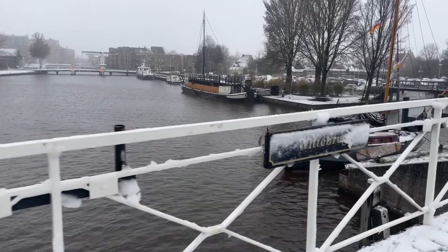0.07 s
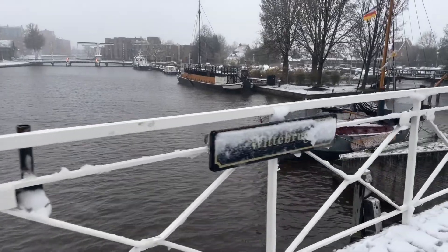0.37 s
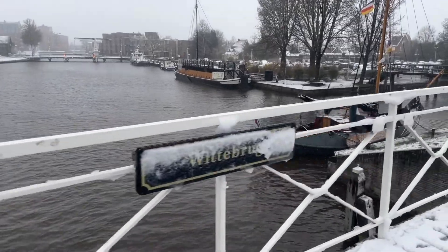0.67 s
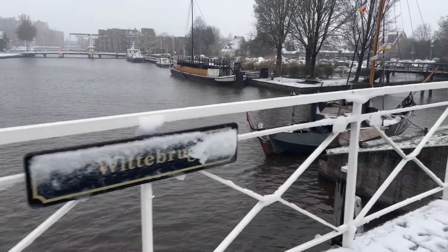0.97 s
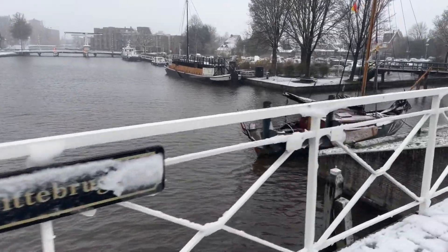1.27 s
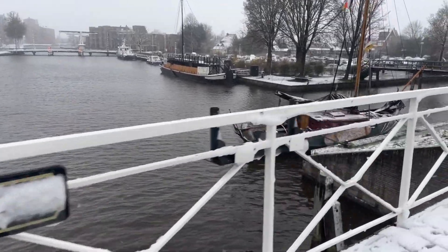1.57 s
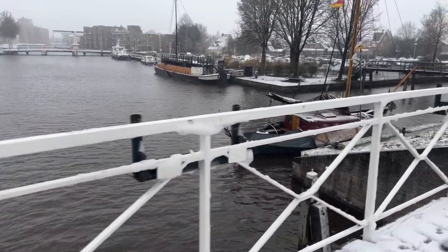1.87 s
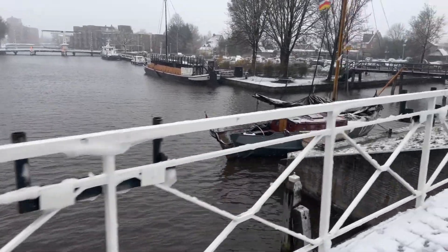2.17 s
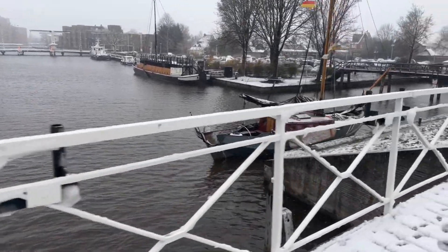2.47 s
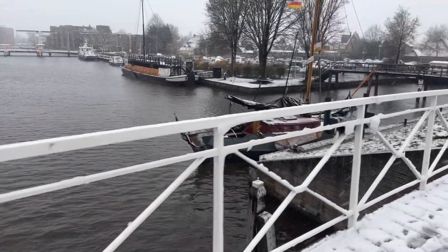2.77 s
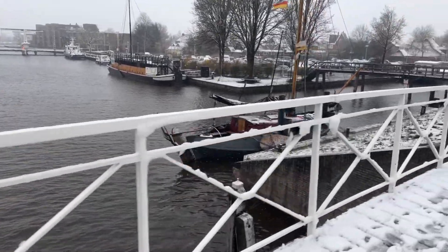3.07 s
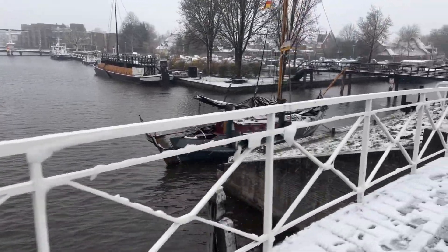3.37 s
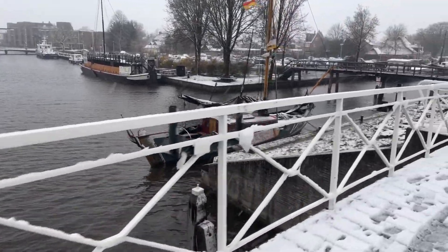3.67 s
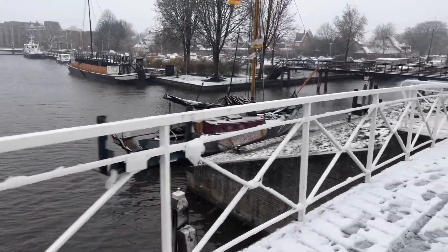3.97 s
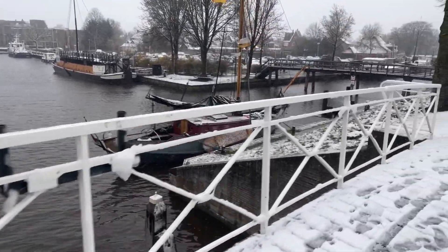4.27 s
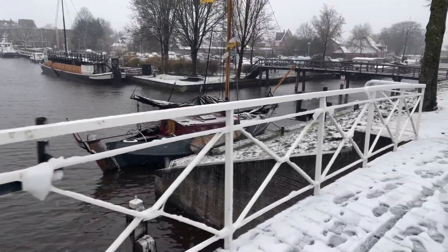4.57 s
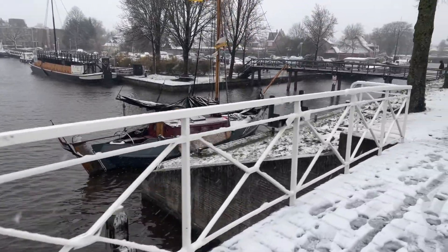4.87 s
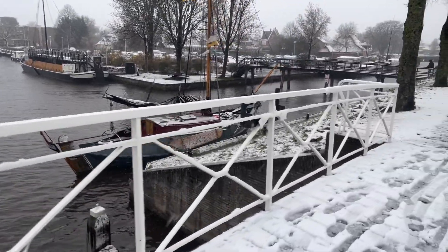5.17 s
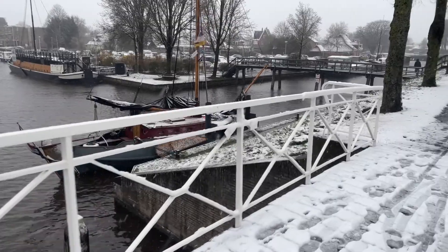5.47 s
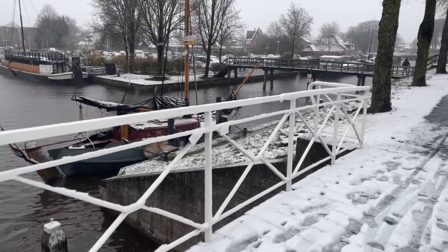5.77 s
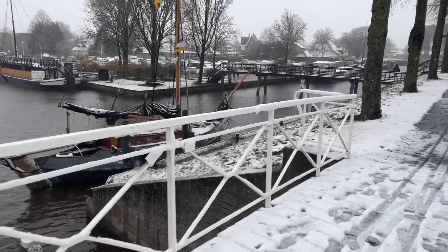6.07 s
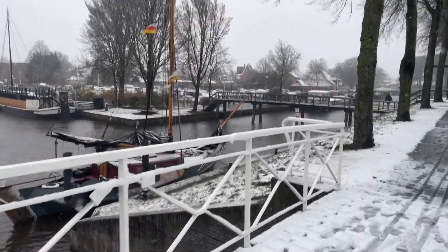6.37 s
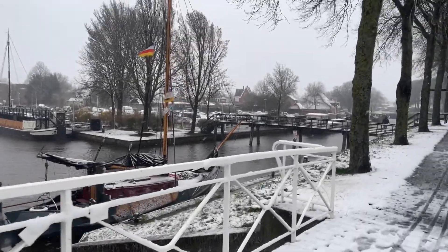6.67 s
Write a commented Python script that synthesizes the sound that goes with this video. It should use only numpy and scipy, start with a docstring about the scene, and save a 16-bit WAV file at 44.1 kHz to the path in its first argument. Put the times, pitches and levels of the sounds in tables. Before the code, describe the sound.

Wind buffets the microphone and dies down to soft puffs, over faint footsteps crunching in snow and distant town traffic.

```python
"""Windy harbour walk in thin snow

A gust buffets a small camera's microphone, sputters in its ports and dies down to soft puffs.
Large eddies rumble and thump; small ones flutter and ring the cavity behind the two ports.
Underneath: faint steps crushing snow crystals, scuffs, small ticks, the hush of the distant town."""
import sys
import numpy as np
from scipy import signal
from scipy.fft import rfft, irfft, next_fast_len
from scipy.io import wavfile
from scipy.ndimage import uniform_filter1d

SR = 44100
rng = np.random.default_rng(int(sys.argv[2]) if len(sys.argv) > 2 else 0)


def wav_out(sig):
    """Save sig, one row per channel (or a flat mono array), as 16-bit PCM at SR to the path in sys.argv[1]."""
    wavfile.write(sys.argv[1], SR, np.round(np.clip(np.atleast_2d(sig).T, -1, 1) * 32767).astype(np.int16))


N = 305172
TIME_S = np.arange(N) / SR
FFT_SIZE = next_fast_len(N)
FREQS_HZ = np.fft.rfftfreq(FFT_SIZE, 1 / SR)

# long gust, then breeze: time_s, pressure_db
WIND = [(0, -35.5), (.15, -42), (.22, -31), (.39, -35), (.7, -33.5), (.84, -39.5), (1.2, -35.5),
        (1.74, -37), (1.82, -44.5), (1.98, -48.5), (2.05, -63), (2.32, -65.5), (2.65, -52), (3.25, -53.5),
        (3.42, -70), (3.8, -59.5), (4.15, -71), (5.7, -70), (6.92, -56.5)]
# short gusts on top: time_s, rumble_db, flutter_db, fade_s
GUSTS = [(0.366, -32.5, -32, 0.05), (1.431, -58, -44.5, 0.052), (1.889, -41, -56.5, 0.052),
         (2.079, -37.5, -61, 0.023), (2.371, -54, -77, 0.04), (2.699, -60, -52.5, 0.02),
         (2.938, -37.5, -46.5, 0.1), (3.06, -59, -55, 0.023), (3.149, -52, -57.5, 0.33),
         (3.5, -58, -62.5, 0.11), (3.81, -46, -55.5, 0.04), (4.339, -49.5, -56, 0.18),
         (4.485, -36.5, -50.5, 0.019), (5.259, -59.5, -68, 0.29), (5.47, -45, -61, 0.0097),
         (6.4, -65, -67, 0.081)]
# largest eddies thumping the microphone: time_s, level_db, pitch_hz
PUFFS = [(.098, -21, 92.5), (0.26, -24, 61), (0.365, -28.5, 410), (0.918, -25, 70), (1.15, -25.5, 97),
         (1.437, -22.5, 340), (1.7, -27.5, 330), (1.71, -29, 129), (1.898, -31, 66), (2.016, -30.5, 115),
         (2.112, -34.5, 69.6), (2.938, -37, 487), (2.95, -33, 300), (3.153, -29, 68), (3.493, -38, 91),
         (3.565, -35.5, 63.2), (4.497, -33, 174), (4.513, -32, 68.4), (4.844, -45.5, 106),
         (5.998, -41.5, 172), (6.809, -46, 69.6)]
# turbulence in the ports: time_s, level_db
SPUTTER = [(0, -41), (.18, -48), (.25, -42), (.32, -40.5), (.4, -38), (.56, -35), (.7, -52.5), (.83, -55),
           (1.35, -52), (1.74, -60), (1.82, -100)]
# eddy flurries rasping across the ports: time_s, level_db, half_length_s
FLURRIES = [(0.228, -34, 0.025), (0.383, -37.5, .02), (0.49, -48, 0.029), (0.702, -38.5, .008),
            (0.761, -37.5, 0.014), (0.969, -41, 0.01), (1.204, -43, 0.0067), (1.285, -38, 0.0074),
            (1.368, -39.5, 0.014), (1.545, -39.5, 0.0088)]
# strong eddies snapping across a port: start_s, level_db, ring_hz, edge_ratio
SNAPS = [(.021, -32, 1670, .3), (.069, -31, 1660, .1), (.114, -26, 1700, 1), (.147, -29, 1610, .1),
         (.168, -29, 1300, .2), (.2005, -21, 1730, 0), (.229, -18, 1740, .1), (.330, -24, 1790, 1),
         (.360, -21, 1560, 0), (.4165, -21, 1700, .2), (.446, -24, 1720, .1), (.473, -23, 1850, .1),
         (.538, -22, 1680, .1), (.595, -27, 1670, .1), (.6172, -24, 1660, .1), (.631, -26, 1800, .1),
         (.646, -26, 1350, .1), (.709, -26, 1660, .1), (.764, -27, 1690, .1), (.787, -31, 1790, 0),
         (.852, -36, 1660, 0), (.918, -31, 1250, 0), (.974, -26, 1590, .1), (.990, -32, 1860, 0),
         (1.107, -34, 1590, .1), (1.181, -33, 1750, 0), (1.206, -31, 1520, 0), (1.270, -30, 1730, 0),
         (1.317, -30, 1350, 0), (1.373, -21, 1500, 0), (1.549, -28.5, 1150, 0), (1.553, -27, 1700, 0),
         (1.697, -27, 1150, 0), (1.747, -34, 1740, 0)]
# footfalls: time_s, heel_db, heel_length_s, sole_delay_s, sole_db
STEPS = [(0.218, -59.5, 0.029, 0.15, -57.5), (0.814, -73.5, .03, 0.082, -62),
         (1.377, -73.5, 0.058, 0.084, -63), (1.918, -61, .025, 0.051, -70),
         (2.418, -71, 0.047, 0.076, -60.5), (2.906, -56.5, 0.012, 0.1, -60.5),
         (3.49, -64, 0.059, .11, -55.5), (3.988, -56, 0.044, .115, -60.5), (4.544, -63, 0.031, 0.083, -62),
         (5.077, -72.5, .03, 0.095, -65), (5.733, -65, 0.039, 0.056, -83), (6.19, -69, 0.051, 0.1, -65),
         (6.75, -71, 0.019, .075, -68)]
# dull scrapes: time_s, level_db, fade_s
SCUFFS = [(2.55, -58.5, 0.021), (5.231, -57, .006), (5.538, -56, 0.023), (5.75, -59.5, 0.18),
          (6.02, -53, 0.019), (6.267, -56, .023), (6.554, -46, 0.02), (6.705, -55, 0.03),
          (6.866, -51, 0.013)]
# ticks between steps: time_s, level_db
TICKS = [(0.012, -56.5), (.191, -63.5), (.3424, -65), (0.5304, -58.5), (.9067, -59.5), (1.72, -63),
         (2.228, -61), (2.748, -57.5), (3.815, -58), (4.329, -58), (4.891, -58), (5.9892, -65)]
# distant town: time_s, level_db
TOWN_LEVEL = [(0, -61.5), (2.25, -66), (2.7, -65), (4.3, -62), (5.5, -61.5), (6.92, -60.5)]

# spectral shapes: freq_hz, relative_db
RUMBLE_SPECTRUM = [(18, -15.5), (33, -10), (50, 1.5), (68, 3), (110, -1), (200, -5.5), (300, -13.5),
                   (450, -18), (900, -77)]
FLUTTER_SPECTRUM = [(100, -26), (220, 2), (350, 4.5), (550, 2), (900, -3.5), (1400, -7), (2500, -32),
                    (5000, -53.5)]
PORT_SPECTRUM = [(200, -21), (600, -3.5), (1000, 2), (1400, 3), (1800, 6), (2080, -5.5), (2300, -10),
                 (3000, -29), (4000, -42.5), (6000, -58.5), (12000, -92.5)]
HISS_SPECTRUM = [(1500, -6.5), (2600, 13), (3400, 1.5), (4300, -12), (5500, -30), (7000, -40),
                 (12000, -54.5)]
SNAP_EDGE_SPECTRUM = [(1500, -14), (2600, 15), (4000, -10), (5500, -24.5), (7000, -34.5), (12000, -54)]
SNAP_BODY_SPECTRUM = [(80, -15), (250, 0.5), (700, 4), (1200, -5), (2500, -31), (6000, -76.5)]
SNOW_SPECTRUM = [(1100, 2), (1750, 15), (2400, -4.5), (3800, -7), (5200, -3), (6400, -2), (7500, -12),
                 (8700, -7), (9800, -26), (12000, -37.5)]
SCUFF_SPECTRUM = [(700, -22), (1400, -12), (1700, 10), (2100, 3), (2550, 1), (3050, -10), (3450, -22),
                  (6000, -47)]
TICK_SPECTRUM = [(2000, -26), (4500, -2.5), (7000, 3), (8700, 7.5), (10000, -5), (12000, -33)]
TOWN_SPECTRUM = [(25, -19), (70, -2.5), (170, 2.5), (330, 0), (700, -0.5), (1100, -6.5), (1450, -8),
                 (1620, -2), (1870, -4.5), (2150, -14.5), (3000, -22.5), (4300, -28.5), (7000, -33),
                 (10500, -52.5)]
# likeness of the two ports: freq_hz, correlation
WIND_CORRELATION = [(60, 0.77), (300, 0.76), (550, 0.39), (900, 0.088), (1600, 1), (2700, 0.21)]
PORT_CORRELATION = [(400, .4), (900, 0.54), (1300, 0.91), (1900, 1), (2700, 0.34)]
TOWN_CORRELATION = [(60, -0.83), (250, 0.76), (500, 0.23), (800, -0.27), (1150, -0.11), (1650, 0.94),
                    (2700, 0.22), (5000, 0.014)]
# town balance: freq_hz, left_minus_right_db
TOWN_BALANCE = [(100, 1), (700, -0.5), (1200, 2.5), (1750, 7), (2700, 1.5), (7000, 1.5)]


def buffeting(strong_db=-34, flutter_db=-5.5, flutter_slope=1.068, calm_db=-59,
              corner_hz=1050, db_per_octave=22, swell_s=0.0089, rumble_lag_s=0.012):
    """Large eddies rumble; small ones flutter in lumps and reach higher in stronger wind."""
    wind_db = follow(WIND)
    depth_db = 0.98 + 0.093 * np.maximum(strong_db - wind_db, 0)  # a weak breeze is less even
    surge = amp(depth_db * wander(rate_hz=18))
    large = amp(wind_db) + strokes([(s + rumble_lag_s, db, swell_s, fade) for s, db, _, fade in GUSTS])
    small = amp(strong_db + flutter_db + flutter_slope * (wind_db - strong_db))
    small += strokes([(s, db, swell_s, fade) for s, _, db, fade in GUSTS])
    correlation = at_freq(WIND_CORRELATION, FREQS_HZ)
    rumble = steady(colour(noise_pair(correlation), RUMBLE_SPECTRUM), samples=2600)
    lumps = noise_pair(correlation) * amp(4.5 * wander(rate_hz=60))
    flutter = steady(colour(lumps, FLUTTER_SPECTRUM), samples=2600)
    onset = 1 / (1 + (amp(calm_db) / small) ** 4)  # small eddies form only above a calm
    hz, frame_s, spectra = signal.stft(flutter * small * surge * onset, SR, nperseg=512)
    small_db = 20 * np.log10(np.interp(frame_s, TIME_S, small))
    cutoff_hz = corner_hz * 2 ** ((small_db - strong_db - flutter_db) / db_per_octave)
    spectra /= np.sqrt(1 + (hz[:, None] / cutoff_hz) ** 8)
    flutter = signal.istft(spectra, SR, nperseg=512)[1][:, :N]
    return rumble * large * surge * amp(0.5) + flutter * pan(2)


def puffs(gain_db=-3.5, fade_cycles=0.79, slowing=0.31):
    """A passing eddy pushes and pulls, slowing as it goes; larger ones are lower and longer."""
    out = np.zeros(N)
    for time_s, db, pitch_hz in PUFFS:
        fade_s = fade_cycles / pitch_hz
        passage = np.arange(-3, 3, 1 / (fade_s * SR))
        cycles = fade_cycles * (1 - np.exp(-slowing * passage)) / slowing
        envelope = amp(db + gain_db) * np.exp(-passage ** 2)
        add(out, time_s + passage[0] * fade_s, envelope * np.sin(2 * np.pi * (cycles + rng.random())))
    return out


def sputter(ring_db=-1, hiss_db=-20, hiss_knee_db=-42, burst_s=0.0043, mean_gap_s=0.0098, spread_db=3.5):
    """Eddies shed at an uneven pace; each burst of air rings the cavity behind the ports."""
    strength = amp(follow(SPUTTER)) + strokes([(s, db, half, half) for s, db, half in FLURRIES])
    merging = 1 / (1 + (amp(hiss_knee_db) / strength) ** 3)  # strong bursts merge and hiss
    gate = 0.22 * (1 + merging)  # floor between bursts
    starts_s = np.cumsum(rng.gamma(2, mean_gap_s / 2, size=400))
    for start_s, db in zip(starts_s, spread_db * rng.standard_normal(400)):
        add(gate, start_s, amp(db) * np.hanning(round(burst_s * SR)))
    air = noise_pair(at_freq(PORT_CORRELATION, FREQS_HZ)) * gate
    ring = steady(colour(air, PORT_SPECTRUM), samples=2800) * amp(ring_db)
    hiss = steady(colour(noise_pair(0.41) * gate, HISS_SPECTRUM), samples=1800) * amp(hiss_db)
    return (ring + hiss * merging) * strength * stalls() * pan(5.5)


def stalls(length_s=0.012, depth_db=-7):
    """Turbulence gain: the flow stalls before each snap while the eddy builds."""
    dip = np.zeros(N)
    for start_s, *_ in SNAPS:
        add(dip, start_s - length_s, signal.windows.tukey(round(length_s * SR)))
    return amp(depth_db * np.minimum(dip, 1))


def snaps(ring_db=-4, splash_db=-8.5, body_db=-8, edge_db=-14,
          ring_rise_s=0.0009, ring_lag_s=0.00099, splash_rise_s=0.00059):
    """A strong eddy rings a port briefly, in a splash of air with a low body; some have a sharp edge."""
    rings, splashes, edges = np.zeros((3, N))
    age_s = np.arange(SR // 50) / SR
    ring_shape = (age_s / ring_rise_s * np.exp(1 - age_s / ring_rise_s)) ** 1.44  # rounded, so dull
    burst = age_s / splash_rise_s * np.exp(1 - age_s / splash_rise_s)
    for start_s, db, ring_hz, edge_ratio in SNAPS:
        tone = np.sin(2 * np.pi * (ring_hz * age_s + rng.random()))
        add(rings, start_s + ring_lag_s, amp(db + ring_db) * ring_shape * tone)
        add(splashes, start_s, amp(db) * burst)
        add(edges, start_s, amp(db + edge_db) * edge_ratio * burst)
    air = noise_pair(at_freq(PORT_CORRELATION, FREQS_HZ))
    splash = amp(splash_db) * colour(splashes * air, PORT_SPECTRUM)
    edge = colour(edges * air, SNAP_EDGE_SPECTRUM)
    body = amp(body_db) * colour(splashes * air, SNAP_BODY_SPECTRUM)
    return (rings + splash + edge) * pan(4) + body


def footsteps(gain_db=-5, sole_swell_s=0.026, sole_fade_s=0.036, drag_db=-73, drag_s=0.09,
              grain_db=-1, clump_db=2.5, crack_db=10.5, cracks_per_s=150):
    """Heel, then sole, in a faint drag: snow crystals break in clumped grains and a few larger cracks."""
    heels = strokes([(s, db, length, length) for s, db, length, _, _ in STEPS])
    soles = strokes([(s + delay, db, sole_swell_s, sole_fade_s) for s, _, _, delay, db in STEPS])
    drag = strokes([(s + delay / 2, drag_db, drag_s, drag_s) for s, _, _, delay, _ in STEPS])
    grains = noise_pair(0.2) * amp(grain_db * wander(rate_hz=1500) + clump_db * wander(rate_hz=55))
    breaks = rng.random(N) < cracks_per_s / SR
    cracks = breaks * amp(crack_db) * rng.uniform(1, 2.6, N) * rng.choice([-1, 1], (2, N))
    crunch = (unit_rms(grains) + cracks) * (heels + soles + drag)
    return amp(gain_db) * colour(crunch, SNOW_SPECTRUM) * pan(3)


def scuffs(gain_db=-7, swell_ratio=0.54):
    """Short smooth rubs, duller than the crunch; probably a sole on paving."""
    rub = strokes([(s, db, swell_ratio * fade, fade) for s, db, fade in SCUFFS])
    return amp(gain_db) * colour(noise_pair(0.94) * rub, SCUFF_SPECTRUM) * pan(0.5)


def ticks(gain_db=-6, lag_s=0.0017, swell_s=0.00068, fade_s=0.0012, rustle_db=-17, rustle_s=0.013):
    """Tiny bright ticks, each in a brief rustle; perhaps a zip pull swinging on the coat."""
    tick = strokes([(s + lag_s, db, swell_s, fade_s) for s, db in TICKS])
    rustle = strokes([(s, db + rustle_db, rustle_s / 2, rustle_s) for s, db in TICKS])
    return amp(gain_db) * colour(rng.standard_normal((2, N)) * (tick + rustle), TICK_SPECTRUM) * pan(-5)


def town(gain_db=3, drift_db=1, flicker_db=1.14):
    """Far traffic over the water, coloured by the port resonance."""
    hush = unit_rms(colour(noise_pair(at_freq(TOWN_CORRELATION, FREQS_HZ)), TOWN_SPECTRUM))
    balance = amp(np.outer([0.5, -0.5], at_freq(TOWN_BALANCE, FREQS_HZ)))
    hush = irfft(rfft(hush, FFT_SIZE) * balance, FFT_SIZE)[:, :N]
    waver_db = drift_db * wander(rate_hz=12) + flicker_db * wander(rate_hz=40)
    return hush * amp(follow(TOWN_LEVEL) + gain_db + waver_db)


def amp(db):
    """Decibels to gain."""
    return 10 ** (np.asarray(db) / 20)


def pan(left_minus_right_db):
    """Left and right gains."""
    return amp(np.array([[0.5], [-0.5]]) * left_minus_right_db)


def unit_rms(x):
    """Scales to rms 1."""
    return x / np.sqrt(np.mean(x ** 2) + 1e-20)


def steady(x, samples):
    """Holds the running rms at 1, keeping the finer grain."""
    return x / np.sqrt(abs(uniform_filter1d((x ** 2).mean(0), samples)) + 1e-12)


def at_freq(table, hz):
    """Interpolates on a log-frequency axis."""
    freq_hz, values = np.transpose(table)
    return np.interp(np.log(hz + 1), np.log(freq_hz + 1), values)


def follow(table):
    """A time curve at every sample."""
    return np.interp(TIME_S, *np.transpose(table))


def strokes(rows):
    """Envelope of pushes that swell and fade; rows: peak_s, level_db, swell_s, fade_s."""
    t = TIME_S[::32]
    pushes = (amp(db) * np.exp(-np.maximum((s - t) / swell, (t - s) / fade))
              for s, db, swell, fade in rows)
    return np.interp(TIME_S, t, sum(pushes))


def wander(rate_hz):
    """Low-passed noise of rms 1."""
    lowpass = np.exp(-np.minimum(FREQS_HZ / rate_hz, 10) ** 2)
    return unit_rms(irfft(rfft(rng.standard_normal(FFT_SIZE)) * lowpass, FFT_SIZE)[:N])


def noise_pair(correlation):
    """Correlated white noise at the two ports."""
    left, independent = rfft(rng.standard_normal((2, FFT_SIZE)))
    correlation = np.clip(correlation, -1, 1)
    right = correlation * left + np.sqrt(1 - correlation ** 2) * independent
    return irfft(np.array([left, right]), FFT_SIZE)[:, :N]


def colour(x, spectrum):
    """Minimum-phase filter of unit energy: a click rings after it lands."""
    log_gain = np.log(amp(at_freq(spectrum, abs(np.fft.fftfreq(8192, 1 / SR)))))
    ring = np.fft.ifft(np.exp(np.conj(signal.hilbert(log_gain)))).real[:4096]
    return signal.oaconvolve(x, ring[None] / np.linalg.norm(ring), axes=1)[:, :N]


def add(mix, start_s, sound):
    """Mixes a short sound in place."""
    part = mix[..., max(round(start_s * SR), 0):][..., :sound.shape[-1]]
    part += sound[..., :part.shape[-1]]


def scene():
    """Wind on the microphone over the walker and the town."""
    return buffeting() + puffs() + sputter() + snaps() + footsteps() + scuffs() + ticks() + town()


def record(dry, low_cut_hz=40, high_cut_hz=12300):
    """Bass cut and band limit."""
    highpass = signal.butter(3, low_cut_hz, "highpass", fs=SR, output="sos")
    lowpass = signal.firwin(511, high_cut_hz, window=("kaiser", 9), fs=SR)
    return signal.oaconvolve(signal.sosfilt(highpass, dry), lowpass[None], "same")


dry = scene()
out = record(dry)
wav_out(out)
```